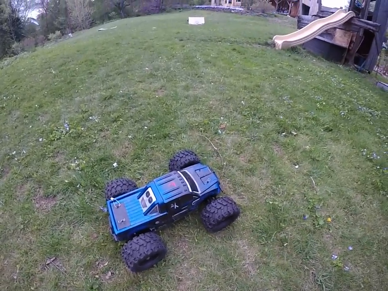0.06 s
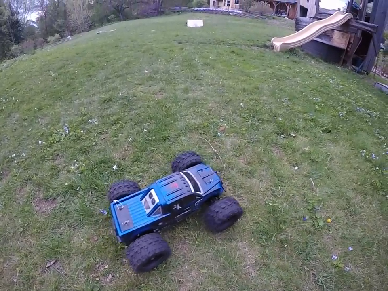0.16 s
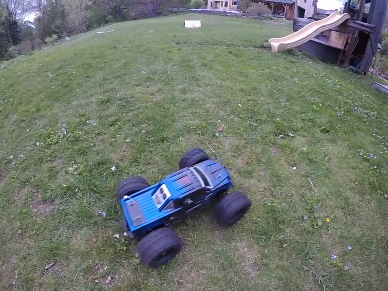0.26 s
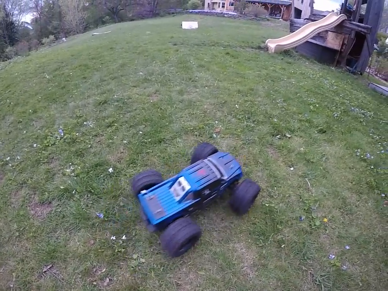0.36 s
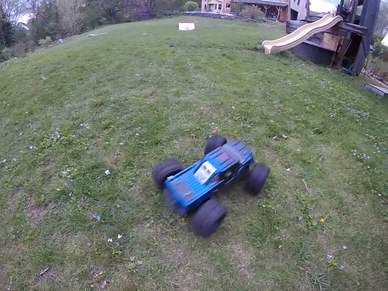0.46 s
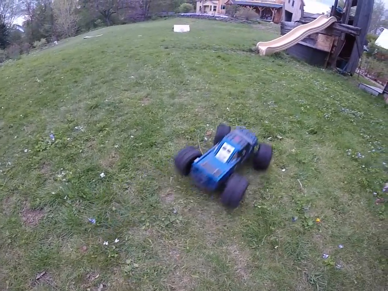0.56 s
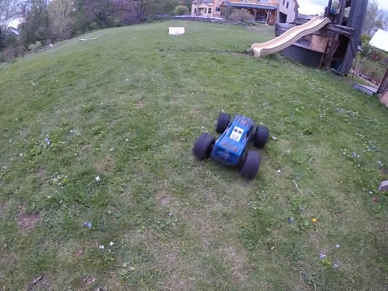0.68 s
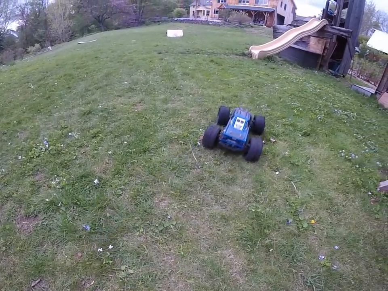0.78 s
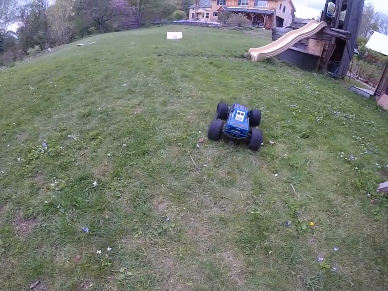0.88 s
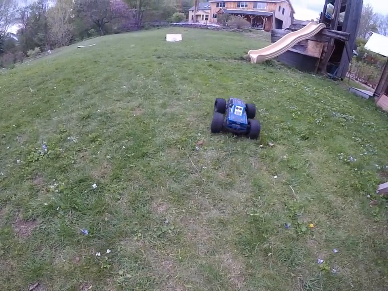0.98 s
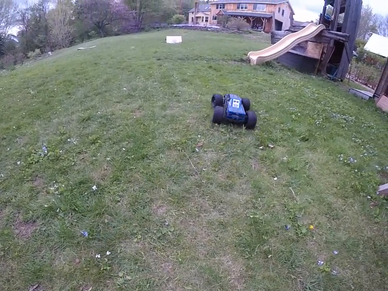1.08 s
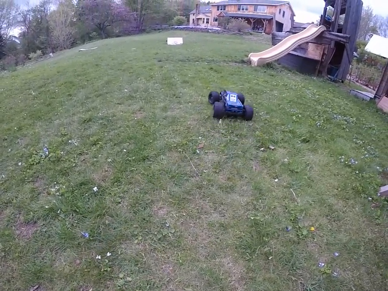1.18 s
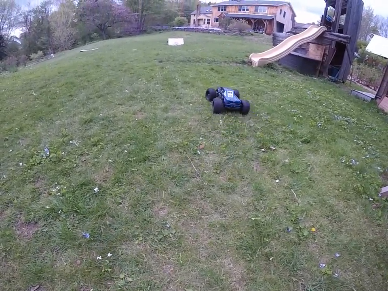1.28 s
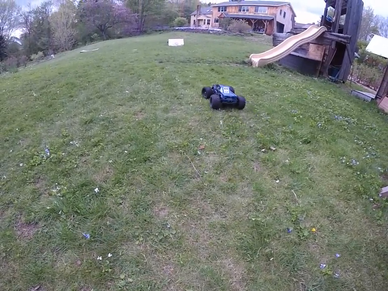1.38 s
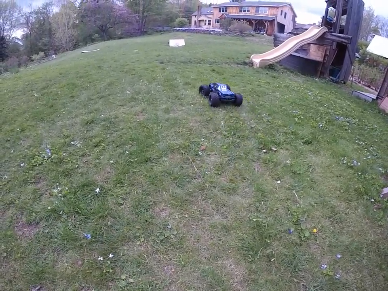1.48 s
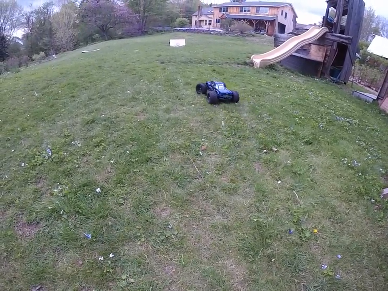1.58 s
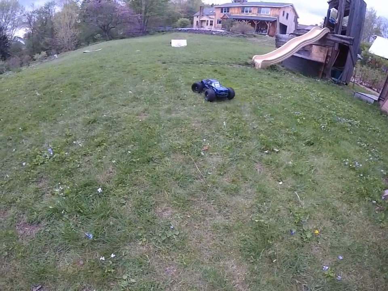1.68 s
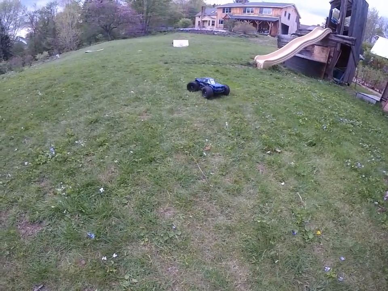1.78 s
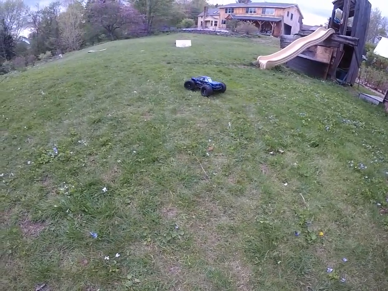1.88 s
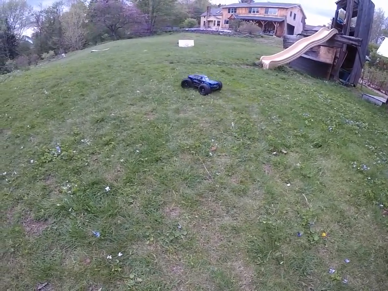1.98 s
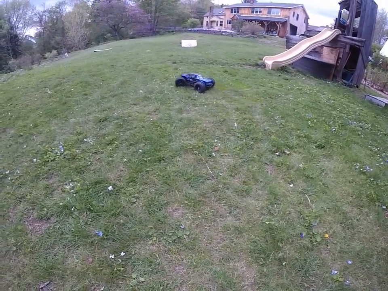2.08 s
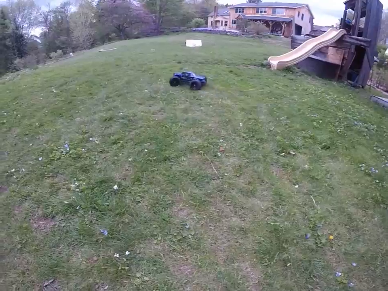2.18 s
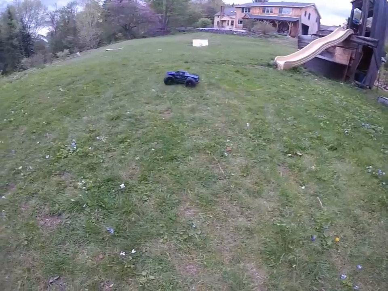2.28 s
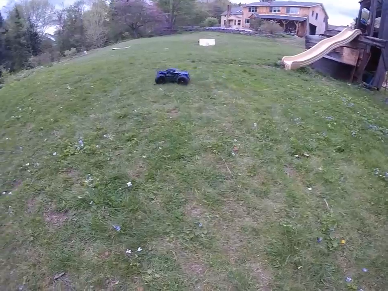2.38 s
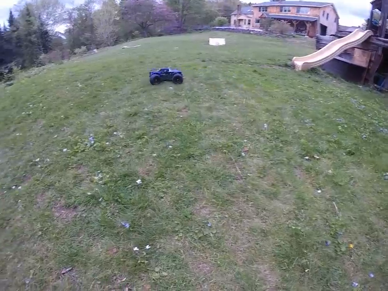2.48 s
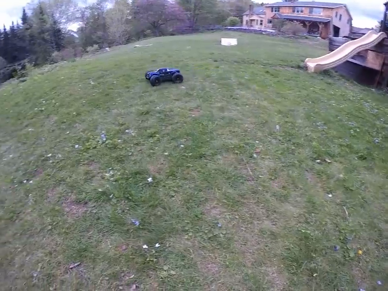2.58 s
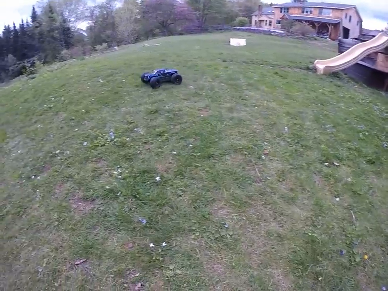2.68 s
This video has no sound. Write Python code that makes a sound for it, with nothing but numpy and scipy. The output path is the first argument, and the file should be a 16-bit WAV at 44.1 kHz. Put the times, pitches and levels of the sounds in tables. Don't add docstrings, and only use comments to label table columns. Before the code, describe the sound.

A small electric model truck drives off over grass. Clacks and gritty motor lurches from 0.14 s lead into a loud rising gear whine until 0.64 s, with tyre swish and a thin high whistle. Loose plastic clacks from 0.7 s; shorter whines follow at 0.95 and 1.6 s, then a longer one climbs from 1.95 to 2.43 s. Faint bird chirps at 1.4 and 1.8 s, soft breeze, final clacks.

```python
import sys
import numpy as np
from scipy import signal
from scipy.fft import rfft, irfft
from scipy.io import wavfile
from scipy.ndimage import uniform_filter1d

SR = 44100
rng = np.random.default_rng(int(sys.argv[2]) if len(sys.argv) > 2 else 0)


def gain_from_db(level_db):
    decades = np.asarray(level_db, float) / 20
    return 10 ** decades


def to_wav(s):
    ch = np.atleast_2d(s).T
    pcm = np.round(np.clip(ch, -1, 1) * 32767)
    wavfile.write(sys.argv[1], SR, pcm.astype(np.int16))


N = 119070
SIDES = np.array([[1], [-1]])

# time in seconds, tyres in the grass in dB, breeze and chassis rumble in dB.
MOTION = [(0,-54.5,-60),(.2,-50,-43.5),(.45,-35.5,-45),(.7,-40,-47),(.83,-46,-49.5),(1.2,-48.5,-50),(1.5,-52,-51.5),(2.0,-49.5,-49),(2.3,-42.5,-42),(2.52,-50.5,-38.5),(2.7,-48.5,-48)]
# start in seconds, end in seconds, rattle in dB.
MOTOR_ON = [
    (0.13,0.293,-66),
    (0.301,0.637,-41),
    (0.88,1.121,-42),
    (1.575,1.757,-44.5),
    (1.942,2.064,-45.5),
    (2.05,2.244,-45),
    (2.272,2.443,-38),
]
# pitch in Hz, width in Hz, level in dB.
SHELL_RINGS = [(390,64,-1),(608,88,5),(803,326,-5.5),(1293,164,1),(1626,173,6),(1890,257,4.5),(2343,174,-1),(3160,1800,-21.5)]


def curve(rows, col):
    rows = np.array(rows, float)
    return np.interp(np.arange(N) / SR, rows[:, 0], rows[:, col])


def unit(x):
    return x / np.sqrt(np.mean(x ** 2))


def band(x, hz, width):
    return signal.lfilter(*signal.iirpeak(hz, hz / width, fs=SR), x)


def band_twice(x, hz, width):
    return band(band(x, hz, width), hz, width)


def body(x, peaks):
    return sum((-1) ** k * gain_from_db(db) * band(x, hz, width) for k, (hz, width, db) in enumerate(peaks))


def walk(rate):
    k = int(SR / rate)
    steps = np.repeat(rng.standard_normal(N // k + 1), k)
    return 1.396 * uniform_filter1d(uniform_filter1d(steps, k), k)[:N]


def gate(start, end, edge):
    t = np.arange(N) / SR
    return np.clip(np.minimum(t - start, end - t) / edge + 0.5, 0, 1)


def hiss(points, flicker_db):
    f = np.arange(N // 2 + 1) * SR / N + 1
    hz, db = np.array(points, float).T
    x = irfft(rfft(rng.standard_normal(N)) * gain_from_db(np.interp(np.log(f), np.log(hz), db)), N)
    octaves = 125 * 2.0 ** np.arange(7)
    return unit(sum(band(x, mid, mid) * gain_from_db(flicker_db * walk(24.6)) for mid in octaves))


def dull(x):
    return signal.sosfilt(signal.butter(5, 8050, fs=SR, output="sos"), x)


def garden():
    # pitch in Hz, level in dB.
    colour = [(88, -54), (150, -6), (275, -8), (418, -12), (753, -15.5), (876, -30), (14000, -24)]
    front, wide = (hiss(colour, 1.5) for _ in range(2))
    return gain_from_db(-54) * (front + gain_from_db(5.5) * SIDES * (0.7 * dull(wide) + 0.35 * wide))


def fan():
    noise = rng.standard_normal(N) + 0.89 * rng.standard_normal((2, N))
    return gain_from_db(-61) * unit(band_twice(noise, 10470, 200))


def breeze():
    middle, side = (unit(band(rng.standard_normal(N), 183.5, 126) * gain_from_db(2.5 * walk(18))) for _ in range(2))
    return gain_from_db(curve(MOTION, 2)) * (middle + gain_from_db(-6) * SIDES * side)


def grass():
    # pitch in Hz, level in dB.
    colour = [(300,0.5),(1000,-4),(1640,1.5),(2700,-3.5),(4000,-10),(7500,-8),(9000,-17),(12000,-40)]
    return gain_from_db(curve(MOTION, 1)) * hiss(colour, 3)


def whistle():
    levels = [-53, -52, -56, -60, -53, -53, -52]
    on = sum(gain_from_db(db) * gate(start, end, 0.0049) for (start, end, _), db in zip(MOTOR_ON, levels))
    hz = 8048 + 5.8 * walk(9.7)
    return np.sqrt(2) * on * gain_from_db(1.5 * walk(30.1)) * np.sin(2 * np.pi * np.cumsum(hz) / SR)


def rattle():
    # pitch in Hz, width in Hz, level in dB.
    rings = [(3200,950,0.5),(3800,850,1.5),(4060,250,2),(6650,1830,-9)]
    on = sum(gain_from_db(db) * gate(start, end + 0.014, 0.069) for start, end, db in MOTOR_ON)
    grains = rng.standard_normal(N) * gain_from_db(3.76 * walk(400) + 0.97 * walk(60.1))
    return dull(on * unit(body(grains, rings)))


def knocks(rows, fade_s, chatter_db):
    # pitch in Hz, width in Hz, level in dB.
    rings = [(1705,216,-4.5),(2394,220,-3),(6070,560,-9.5)]
    out, size = np.zeros(N + SR), SR // 8
    t = np.arange(size) / SR
    for start, db, hz in rows:
        jumps = np.repeat(rng.standard_normal(size // 64 + 1), 64)[:size]
        chatter = gain_from_db(chatter_db * jumps * (t > 0.002))
        fade = np.exp(-t / 0.0024) + 0.57 * chatter * np.exp(-np.log(1000) * t / fade_s)
        burst = rng.standard_normal(size) * fade
        snap = gain_from_db(-20) * band_twice(burst, 13400, 1800)
        x = dull(band(burst, hz, 0.25 * hz) + body(burst, rings)) + snap
        i = int(start * SR)
        out[i:i + size] += x * gain_from_db(db) / np.abs(x).max()
    return out[:N]


def clacks():
    # start in seconds, level in dB, ring in Hz.
    hits = [(0.1387, -31.5, 4120), (0.2299, -18.5, 4340), (0.3004, -21.5, 3670), (0.6913, -18.5, 3160),
            (0.7185, -24.5, 2920), (0.7743, -20.5, 3900), (0.7872, -24, 3380), (0.8625, -20, 4110),
            (0.9145, -20.5, 3160), (0.947, -21.5, 3084), (1.1187, -25.5, 3054), (1.1377, -21.5, 3736),
            (1.2157, -26.5, 3300), (1.2383, -25.5, 3640), (1.329, -31, 4050), (1.3514, -29, 3500),
            (1.4731, -23.5, 3670), (1.5742, -28, 3480), (1.586, -27.5, 3527), (1.775, -33, 3610),
            (1.935, -28.5, 3396), (1.947, -23.5, 3500), (2.584, -26.5, 3630), (2.6518, -25, 3600)]
    return knocks(hits, fade_s=0.06, chatter_db=6.7)


def lurches():
    # start in seconds, level in dB.
    jerks = [(0.143, -21.5), (0.176, -26), (0.21, -27), (0.24, -16.5), (0.265, -20), (0.307, -15),
             (0.331, -15.5), (0.626, -24.5), (0.352, -17.5), (0.924, -27), (1.592, -28.5)]
    t, swell = np.arange(N) / SR, 0
    for start, db in jerks:
        u = np.clip((t - start) / 0.0028 + 1, 0, 40)
        swell = swell + gain_from_db(db - 5) * (u / 2 * np.exp(1 - u / 2)) ** 2
    blows = rng.standard_normal(N) * gain_from_db(2.8 * walk(300))
    return swell * unit(body(blows, SHELL_RINGS + [(322, 150, -14)]))


def ticks():
    # start in seconds, level in dB, ring in Hz.
    hits = [(0.183, -24.5, 6030), (0.2145, -33, 2380), (0.5266, -22.5, 4550), (0.6001, -22, 3940),
            (0.921, -16, 1620), (1.2334, -30, 4120), (1.242, -40, 3040), (1.2495, -31, 3270),
            (0.902, -27, 1620), (1.503, -33.5, 3480), (1.8746, -28.5, 3930), (1.8966, -29, 4000),
            (2.4553, -22, 2317), (2.5165, -27.5, 2450), (2.5351, -29.5, 3050), (2.6025, -28.5, 2220)]
    return knocks(hits, fade_s=0.03, chatter_db=7.4)


def gears():
    # time in seconds, tooth pitch in Hz, then fundamental, second and third overtone in dB.
    away = [(0.345, 428.8, -38, -51, -39), (0.373, 420.8, -27, -45, -27.5), (0.381, 487.7, -34, -35, -32),
            (0.409, 536, -49, -31.5, -35), (0.423, 611.6, -34, -25.5, -26),
            (0.441, 658.6, -51, -23.5, -27.5), (0.455, 634.2, -22, -20.5, -32),
            (0.461, 616.4, -25, -43, -30), (0.475, 586, -26.5, -28, -46)]
    climb = [(0.475, 627.1, -23, -29, -35), (0.489, 609.6, -28.5, -25, -36), (0.501, 647, -40, -20.5, -25),
             (0.515, 760.5, -43.5, -20, -50), (0.555, 771, -27.5, -25, -41), (0.575, 783, -50, -20, -57),
             (0.593, 738, -36.5, -35, -50), (0.607, 846.7, -55, -34.5, -57), (0.635, 802.7, -42, -29, -59)]
    turning = [(0.935, 683, -45, -44, -42), (0.969, 646, -35, -52, -31), (0.979, 662.9, -41, -46, -26.5),
               (0.997, 600, -53, -49, -31), (1.019, 591.3, -40, -58, -44), (1.031, 631, -36, -52, -31),
               (1.047, 662.4, -43, -65, -30.5), (1.061, 679.4, -53, -36.5, -39.5),
               (1.125, 533.3, -47.5, -74, -57)]
    soft = [(1.6, 438.4, -46, -51, -48), (1.632, 488.6, -38.5, -46, -47), (1.656, 543.4, -50, -52, -41),
            (1.668, 565, -44.5, -61, -43.5), (1.71, 494.6, -47, -52.5, -44), (1.742, 570, -59, -62, -51),
            (1.75, 558.5, -66, -73, -53)]
    hold = [(1.955, 557.9, -39, -58, -41), (1.971, 574, -38.5, -55, -42), (2.009, 564.6, -32.5, -58, -30.5),
            (2.023, 647.7, -27.5, -55, -48), (2.049, 570.8, -35.5, -66, -29.5),
            (2.065, 653.5, -35.5, -49, -52), (2.077, 729.1, -42, -30.5, -31.5),
            (2.089, 772.9, -49, -30.5, -40), (2.1, 752.8, -38, -47, -40)]
    ease = [(2.1, 756.7, -45, -52, -41), (2.116, 754.4, -42, -37, -35.5), (2.146, 715, -47, -36.5, -42),
            (2.156, 688.9, -31, -48, -58), (2.176, 600.7, -32, -68, -40), (2.186, 652.3, -37, -62, -32),
            (2.2, 721.7, -34, -42, -57), (2.22, 768, -50, -33.5, -52), (2.25, 776, -43.5, -38.5, -38)]
    rise = [(2.25, 858.2, -46, -46, -52), (2.306, 1075, -48, -33, -55), (2.33, 975, -41.5, -31, -39),
            (2.352, 1070, -36.5, -46, -44), (2.366, 1277, -38.5, -44, -44), (2.392, 1164, -35.5, -36, -42),
            (2.406, 1236, -37, -40, -62), (2.418, 1462, -30.5, -56, -39), (2.435, 1123, -45, -60, -55)]
    upper_db = [-7, -13, -9.5, -5]
    grit_db = [-7, -4, -1.5, -5]
    tight_spot = [0.28, .3, 0.33, 0.26]
    # pitch in Hz, width in Hz, level in dB.
    tooth_rings = [(3100,900,-11),(4100,900,-13)]
    pinion_teeth = 14
    pulls = (away + climb[1:], turning, soft, hold + ease[1:] + rise[1:])
    rows = sorted(sum(pulls, []))
    rings = SHELL_RINGS + tooth_rings
    grit = unit(body(rng.standard_normal(N) * gain_from_db(3.2 * walk(150)), rings))
    hz = uniform_filter1d(curve(rows, 1), size=300) * (1 + 0.01205 * walk(110))
    phase = 2 * np.pi * np.cumsum(hz) / SR
    low = [gain_from_db(curve(rows, col)) for col in range(2, 5)]
    whine = np.sqrt(sum(level ** 2 for level in low))
    on = np.array([gate(pull[0][0], pull[-1][0], 0.0074) for pull in pulls])
    shaft = phase / pinion_teeth + np.array(tight_spot) @ on
    upper = gain_from_db(upper_db) @ on * whine
    tone = 0
    for k in range(1, 10):
        if k < 4:
            level = on.sum(0) * low[k - 1]
        else:
            shade = np.sqrt(sum(gain_from_db(db) ** 2 / (1 + (2 * (k * hz - f) / width) ** 2) ** 1.95
                                for f, width, db in rings))
            level = upper * shade * gain_from_db(-np.log2(k) + 4.25 * walk(150))
        wobble_db = 3.5 * np.sin(shaft + rng.uniform(0, 1)) + 2 * walk(59.78)
        tone = tone + np.sqrt(2) * level * gain_from_db(wobble_db) * np.sin(k * phase)
    return tone + gain_from_db(grit_db) @ on * whine * grit


def coasting():
    ring = band_twice(rng.standard_normal(N), 1603, 120)
    return gain_from_db(curve(MOTION, 1) - 4.5 + 1.6 * walk(30)) * gate(0.42, 1.18, 0.05) * unit(ring)


def bird():
    # start in seconds, length in seconds, first pitch in Hz, last pitch in Hz, level in dB.
    chirps = [
        (1.418,.03,7900,6400,-58),
        (1.445,.018,7300,6400,-61),
        (1.792,.075,4450,3650,-48),
    ]
    t, out = np.arange(N) / SR, 0
    for start, length, hz0, hz1, db in chirps:
        u = np.clip((t - start) / length, 0, 1)
        swell = np.abs(np.sin(np.pi * u)) ** 0.3
        phase = 2 * np.pi * np.cumsum(hz0 + (hz1 - hz0) * u) / SR
        out = out + gain_from_db(db + 2.5 * walk(150)) * swell * np.sin(phase)
    return out


def ports(x):
    # pitch in Hz, gap in radians.
    phase_gap = [(100,0.85),(860,-0.97),(1210,1.49),(1900,1.26),(2410,-1.1),(2930,-1.2),(5250,-0.47),(8000,1.37),(10000,-0.87)]
    # pitch in Hz, gap in dB.
    level_gap = [(200,0),(700,-4),(1300,0.5),(2400,2.5),(4400,-1)]
    # time in seconds, difference in dB.
    crossing = [(0,-4),(.5,-2),(.8,2),(1.5,-1),(2.2,3),(2.7,1)]
    f = np.arange(N // 2 + 1) * SR / N + 1
    phase_hz, radians = np.array(phase_gap, float).T
    level_hz, db = np.array(level_gap, float).T
    turn = np.exp(0.5j * np.interp(f, phase_hz, radians))
    half = turn * gain_from_db(0.5 * np.interp(np.log(f), np.log(level_hz), db))
    return irfft(rfft(x) * np.array([half, 1 / half]), N) * gain_from_db(SIDES * curve(crossing, 1) / 2)


def echo(x):
    fade_s = 0.02
    t = np.arange(SR // 10) / SR
    fade = np.exp(-t / fade_s) / np.sqrt(fade_s * SR / 2)
    tails = [unit(rng.standard_normal(len(t))) * fade for _ in range(2)]
    return gain_from_db(-8) * np.array([signal.fftconvolve(x, tail)[:N] for tail in tails])


def scene():
    truck = grass() + whistle() + rattle() + clacks() + lurches() + ticks() + gears() + coasting()
    return ports(truck) + echo(truck) + garden() + fan() + breeze() + bird()


def low_pass(x):
    return signal.sosfilt(signal.butter(12, 15250, fs=SR, output="sos"), x)


def record(dry):
    cut = signal.sosfilt(signal.ellip(8, 1, 45, 126, "high", fs=SR, output="sos"), dry)
    deep = rng.standard_normal(N) + 0.4 * rng.standard_normal((2, N))
    trace = gain_from_db(-27.5 + curve(MOTION, 2)) * unit(band(deep, 51, 41))
    topped = signal.sosfilt(signal.ellip(8, 0.3, 70, 15300, fs=SR, output="sos"), cut + trace)
    mix = signal.lfilter(*signal.butter(2, 11500, fs=SR), topped)
    return low_pass(mix)


dry = scene()
out = record(dry)
to_wav(out)
```